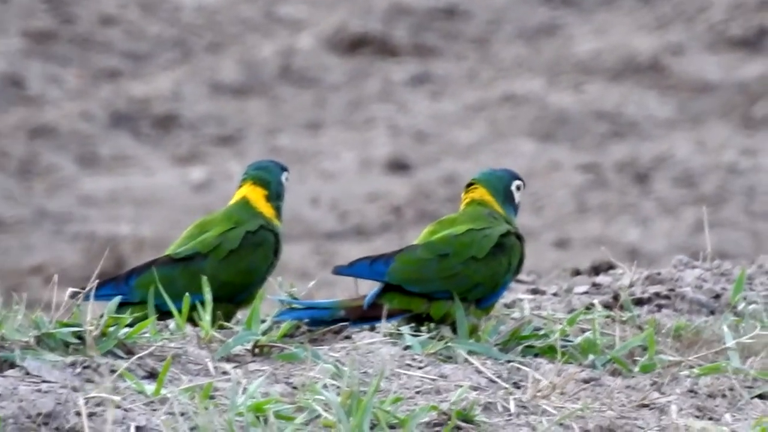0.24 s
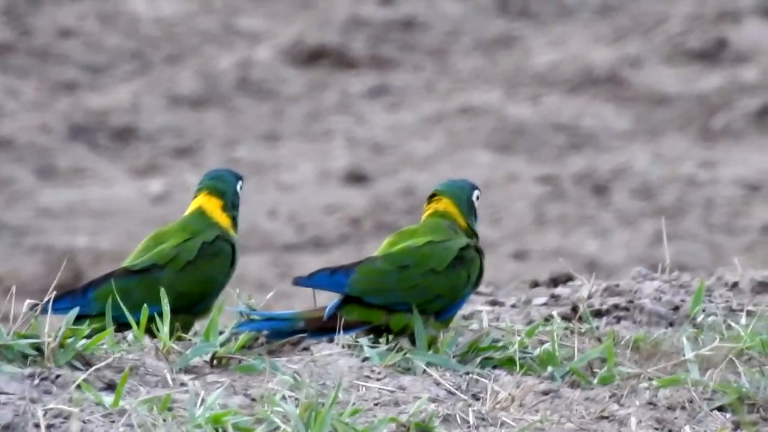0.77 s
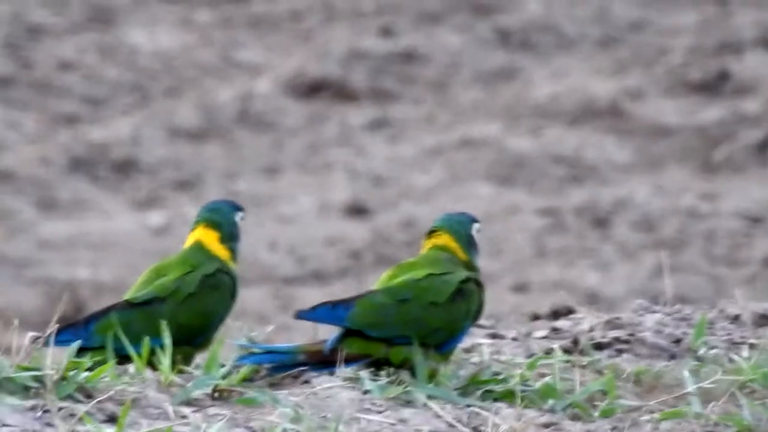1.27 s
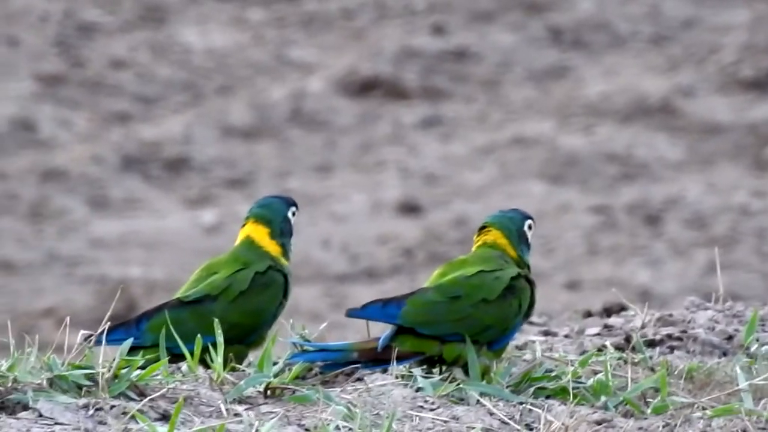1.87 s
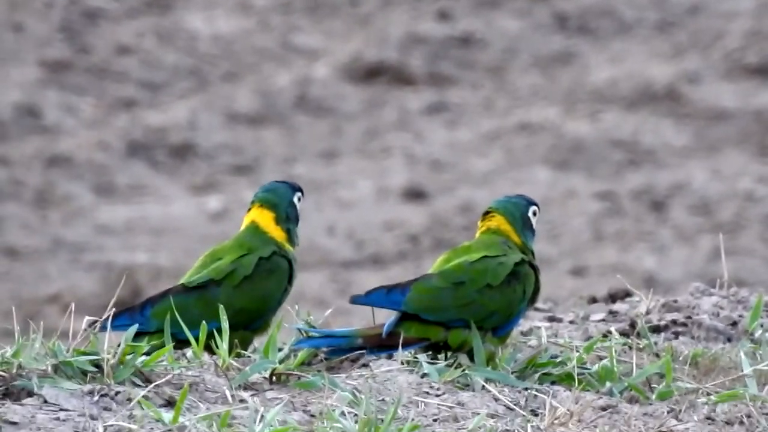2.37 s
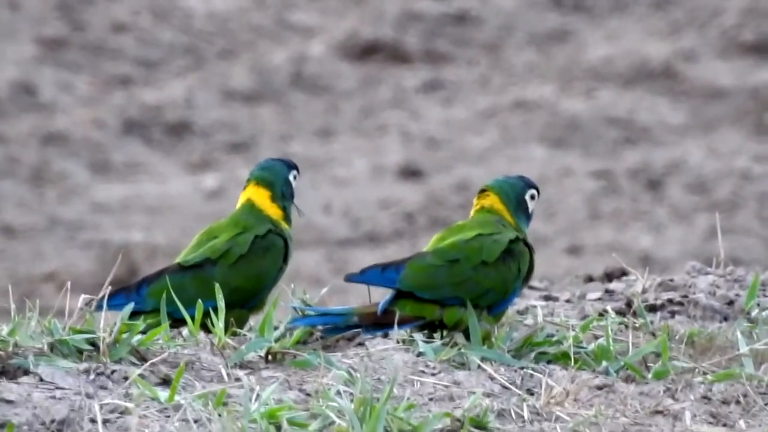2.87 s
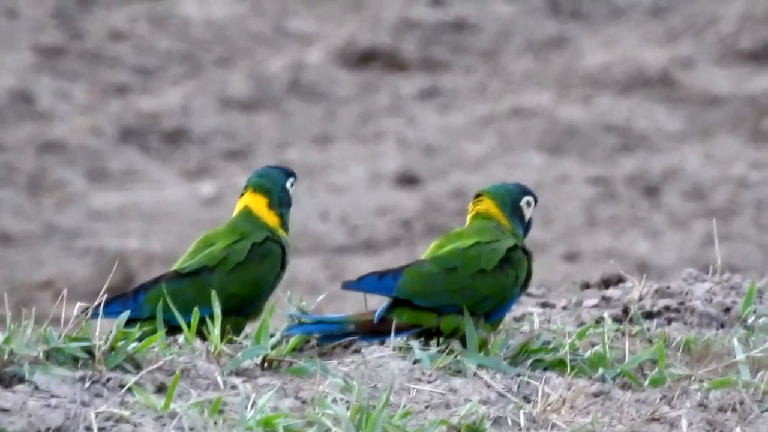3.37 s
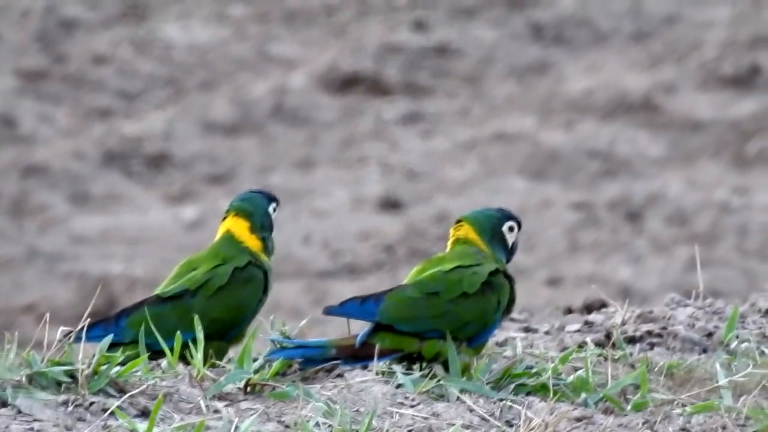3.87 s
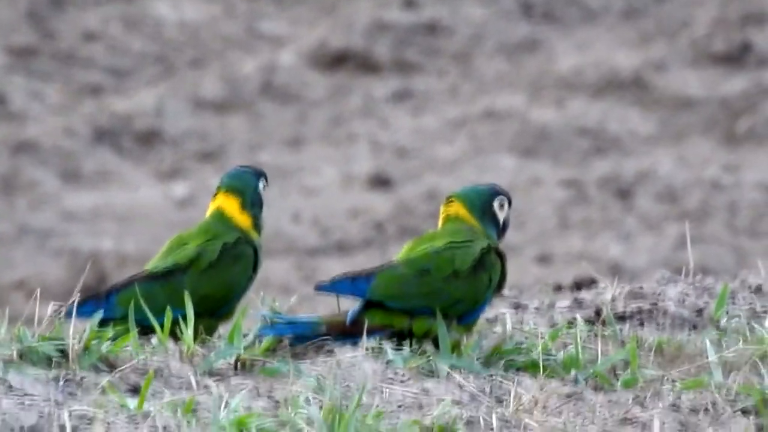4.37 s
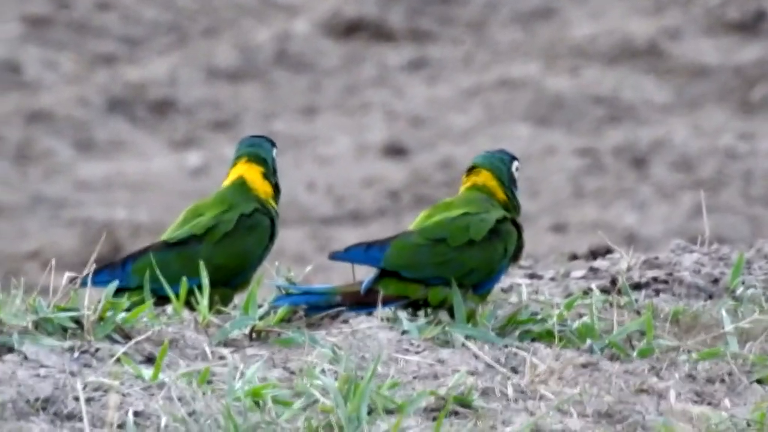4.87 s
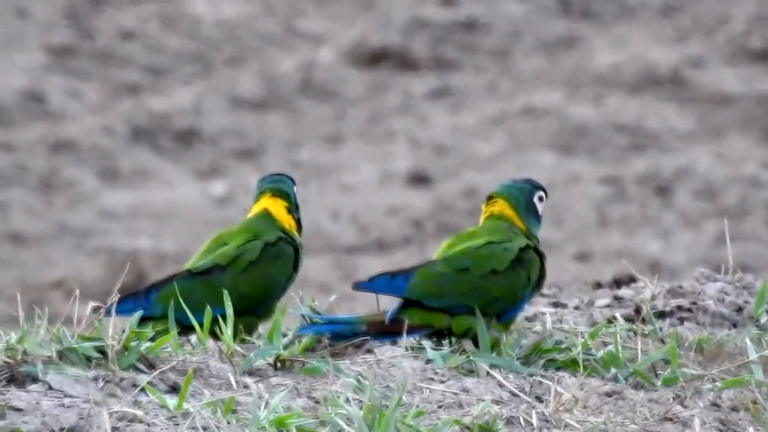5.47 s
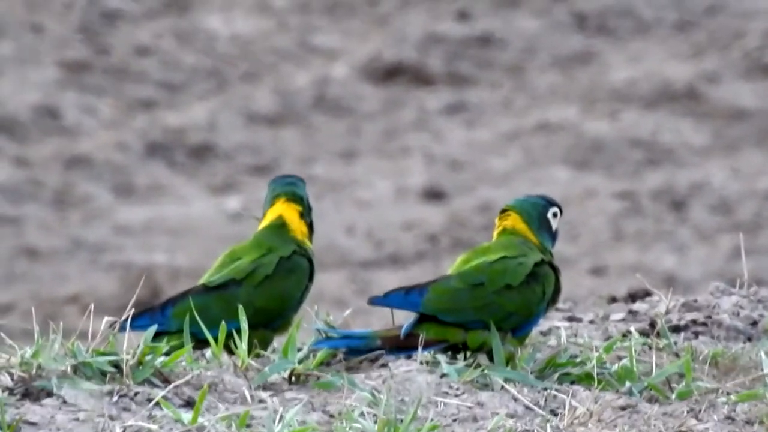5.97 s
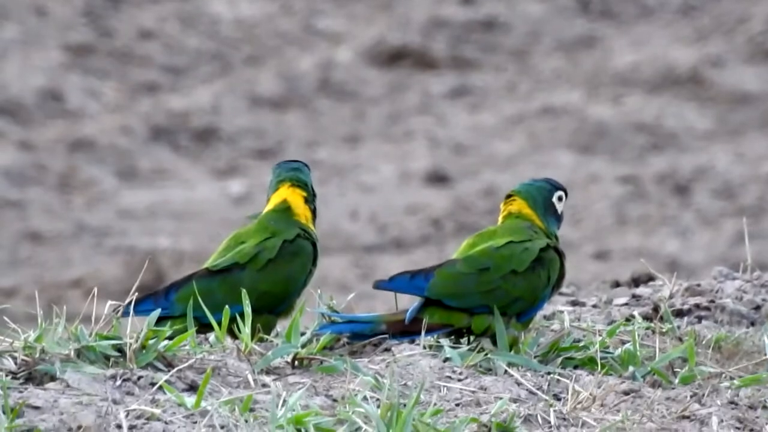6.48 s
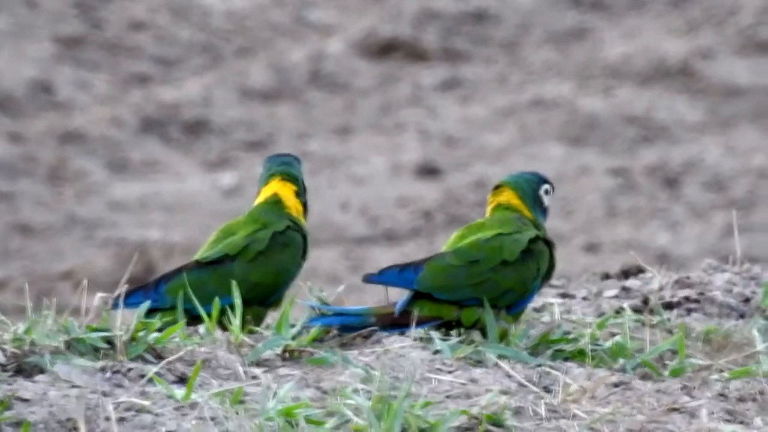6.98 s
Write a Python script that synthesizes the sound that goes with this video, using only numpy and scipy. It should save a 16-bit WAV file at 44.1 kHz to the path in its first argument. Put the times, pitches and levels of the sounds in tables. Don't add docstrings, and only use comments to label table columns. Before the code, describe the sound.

Two parrots on open ground give seven harsh, fluttering screeches that echo off trees, with soft wind hush, small clicks and a final wing whirr.

```python
import sys
import numpy as np
from scipy import signal
from scipy.io import wavfile
from scipy.ndimage import uniform_filter1d

SR = 44100
rng = np.random.default_rng(int(sys.argv[2]) if len(sys.argv) > 2 else 0)


def log_audio(samples):
    frames = np.atleast_2d(samples).T
    limited = np.clip(frames, -1, 1)
    pcm = np.round(limited * 32767).astype(np.int16)
    wavfile.write(sys.argv[1], SR, pcm)


def gain_from_db(level_db):
    decades = np.asarray(level_db, float) / 20
    return 10 ** decades


N = 319284


def rms_one(x):
    return x / np.sqrt(np.mean(x ** 2) + 1e-20)


def columns(rows, t):
    s, *cols = np.transpose(rows)
    return [np.interp(t, s, c) for c in cols]


def at_hz(points, hz):
    points_hz, points_db = np.array(points)[:, 0], np.array(points)[:, 1]
    return np.interp(np.log(hz), np.log(points_hz), points_db)


def wander(hz, size):
    run_in = int(2 * SR / hz)
    low_pass = signal.butter(2, hz, fs=SR, output="sos")
    drift = signal.sosfilt(low_pass, rng.standard_normal(size + run_in))
    return rms_one(drift[run_in:])


def band(x, low_hz, high_hz):
    return signal.sosfilt(signal.butter(2, [low_hz, high_hz], "band", fs=SR, output="sos"), x)


def noise_band(size, low_hz, high_hz):
    return rms_one(band(rng.standard_normal(size), low_hz, high_hz))


def tone(hz):
    return np.sin(2 * np.pi * np.cumsum(hz) / SR)


def add(out, s, x):
    i = int(s * SR)
    out[i:i + len(x)] += x[:N - i]


def swells(rows, calm_db):
    t = np.arange(N) / SR
    gain = gain_from_db(calm_db)
    for s, length_s, db in rows:
        gain = gain + gain_from_db(db) * np.sin(np.pi * np.clip((t - s) / length_s, 0, 1)) ** 2
    return gain


def preamp():
    return gain_from_db(-87) * noise_band(N, 6500, 11000)


def hush():
    # (frequency [Hz], level [dB per Hz])
    hush_colour = [(53, -53), (90, -15.5), (212, -1.5), (298, 1), (1080, -8), (1450, -8.5), (1960, -10.5),
                   (4330, -30), (5980, -19.5), (7400, -32), (10400, -30.5), (13800, -40), (15000, -43)]
    # (time [s], level [dB])
    hush_swell = [(0.0, -64), (1.03, -65.5), (3.1, -66), (3.43, -59.5), (3.67, -60.5), (5.28, -66.5),
                  (6.75, -63.5), (7.24, -66)]
    # (frequency [Hz], width [Hz], level [dB])
    insects = [(5290, 250, -87), (5980, 230, -85.5)]
    out, white = 0, rng.standard_normal((2, N))
    edges_hz = 70 * 2 ** np.arange(0, 8.1, .5)
    for k, (low_hz, high_hz) in enumerate(zip(edges_hz, edges_hz[1:])):
        patchy_db = 2.4 * wander(9.33, N // 8 + 1).repeat(8)[:N]
        level_db = at_hz(hush_colour, np.sqrt(low_hz * high_hz)) + patchy_db
        out = out + gain_from_db(level_db) * band(white[k % 2], low_hz, high_hz)
    out = rms_one(out) * gain_from_db(columns(hush_swell, np.arange(N) / SR)[0] + 4.0)
    for hz, width_hz, level_db in insects:
        out += gain_from_db(level_db) * noise_band(N, hz - width_hz / 2, hz + width_hz / 2)
    return out


def stirring():
    # (time [s], length [s], level [dB])
    stirs = [(0.3, 0.48, -77), (1.2, 1.3, -73.5), (3.05, 0.7, -64), (4.9, 0.92, -67), (6.2, 1.03, -67)]
    # (time [s], length [s], level [dB])
    gusts = [(-0.1, 0.16, -68), (0.33, 0.14, -74), (0.53, 0.14, -57.5), (1.88, 0.2, -76), (2.2, 0.14, -74),
             (3.16, 0.11, -77), (3.6, 0.18, -80), (3.95, 0.2, -81), (4.22, 0.15, -63), (5.52, 0.52, -72.5),
             (7.1, 0.26, -71)]
    grass = rms_one(band(rng.standard_normal(N) * gain_from_db(1.7 * wander(60, N)), 1200, 4300))
    wind = rms_one(band(band(rng.standard_normal(N), 40, 130), 35, 140))
    return swells(stirs, -78.5) * grass + swells(gusts, -77.5) * gain_from_db(-6.5) * wind


def far_birds():
    # (time [s], length [s], start pitch [Hz], end pitch [Hz], level [dB])
    far_notes = [(.12, 0.031, 595, 586, -67.5), (.14, 0.13, 167, 169, -71), (.14, 0.14, 328, 339, -73),
                 (.3, 0.036, 2850, 2880, -77), (.37, 0.068, 4180, 4040, -78),
                 (.46, 0.23, 2010, 1960, -74.5), (.63, 0.085, 2930, 2920, -77.5),
                 (.89, 0.2, 1970, 2164, -76), (0.148, 0.016, 2100, 1450, -68),
                 (0.223, 0.016, 1420, 2360, -69), (1.262, 0.018, 1920, 2700, -69.5),
                 (.48, 0.032, 2890, 2900, -77), (2.904, .1, 2000, 2030, -79),
                 (1.14, 0.034, 3050, 3100, -82), (1.445, 0.085, 2050, 1946, -75.5),
                 (1.5, 0.034, 1240, 1176, -72), (2.37, .03, 1900, 1904, -99), (2.4, 0.036, 602, 646, -74),
                 (5.611, 0.072, 2330, 2460, -66.5), (4.17, 0.097, 469, 508, -75),
                 (5.33, 0.26, 168.6, 154.2, -74), (5.37, 0.1, 334, 318, -69), (5.44, 0.037, 367, 380, -64)]
    out = np.zeros(N)
    for s, length_s, start_hz, end_hz, level_db in far_notes:
        size = int(length_s * SR)
        hz = np.linspace(start_hz, end_hz, size) * (1 + .04 * wander(120, size))
        swell = np.sqrt(np.hanning(size)) * (1 + 0.26 * wander(96, size))
        add(out, s, gain_from_db(level_db + 11.5) * swell * tone(hz))
    return out


def wings():
    # (end time [s], low whirr level [dB], feather rustle level [dB])
    downstrokes = [(6.86, -62, -58), (6.978, -56.5, -57), (7.078, -48.5, -54), (7.175, -51, -57),
                   (7.26, -53, -62)]
    stroke_s, whirr_hz, swell_db_per_s, stop_s = 0.092, 359.6, 598, 0.014
    out, t = np.zeros(N), np.arange(0, stroke_s, 1 / SR)
    stroke = np.clip(np.minimum(t / 0.02, (stroke_s - t) / stop_s), 0, 1)
    swell = stroke * gain_from_db(-swell_db_per_s * np.maximum(stroke_s - 0.028 - t, 0))
    for end_s, whirr_db, rustle_db in downstrokes:
        whirr = np.sqrt(2) * tone(whirr_hz * (1 + 0.044 * wander(40, len(t))))
        grain = rng.standard_normal(len(t)) * gain_from_db(2 * wander(165, len(t)))
        rustle = rms_one(band(grain, 145, 2040)) + gain_from_db(-18.0) * rms_one(band(grain, 2300, 5300))
        puff = gain_from_db(rustle_db) * stroke * gain_from_db(-40 * t) * rustle
        add(out, end_s - stroke_s, gain_from_db(whirr_db) * swell * whirr + puff)
    return out


def snaps():
    # (time [s], peak level [dB], centre frequency [Hz],
    # time to fade by 60 dB [s], bright crack relative to the peak [dB])
    clicks = [(0.358, -40.5, 1190, 0.021, -22), (0.558, -43.5, 700, 0.032, -25),
              (1.789, -44, 853, 0.016, -21), (2.376, -40.5, 777, 0.022, -39), (3.071, -43, 433, 0.023, -25),
              (3.159, -56, 260, 0.033, 7), (3.193, -34, 1080, 0.016, -7), (3.203, -28.5, 240, 0.02, -8),
              (3.211, -38, 710, 0.016, -15), (3.217, -38.5, 324, 0.038, -7), (3.262, -41, 350, 0.034, -15),
              (3.273, -38.5, 350, 0.027, -6), (3.318, -34.5, 727, 0.015, -14),
              (3.319, -41.5, 1580, 0.026, 4), (3.345, -39.5, 350, 0.15, -18),
              (3.399, -36.5, 515, 0.033, -6), (3.413, -39, 2600, 0.018, -5), (3.429, -37, 2730, 0.023, -3),
              (3.803, -35, 2300, 0.032, -9), (5.295, -33, 517, 0.012, -30.5)]
    out, t = np.zeros(N), np.arange(4000) / SR
    for s, peak_db, hz, fade_s, crack_db in clicks:
        ringing = np.cos(2 * np.pi * hz * t) * (gain_from_db(-60 * t / fade_s) + gain_from_db(-60 * t / 0.0028))
        rustle = gain_from_db(-6.5) * noise_band(len(t), 120, 1800)
        crack = gain_from_db(crack_db) * noise_band(len(t), 1820, 9500)
        noise = (rustle + crack) * gain_from_db(-60 * t / (3.7 * fade_s))
        add(out, s, gain_from_db(peak_db - 8) * (ringing + noise))
    return band(band(out, 130, 4940), 100, 10400)


def screech(rows, stretch, mouth_db, open_db, low_db, beak_db, flutter, rasp, clears, left):
    # (frequency [Hz], level [dB])
    throat_colour = [(400, -20.5), (900, -12), (1300, -7), (1800, 0), (2700, -1.5), (3500, 0.5),
                     (4050, -15), (4500, -7), (5250, -21.5), (6200, -16.5), (7700, -26.5), (9000, -42.5),
                     (12000, -51), (16000, -81)]
    mouth_octaves, beak_hz, beak_octaves = 0.28, 4100, 0.079
    t = np.arange(rows[0][0], rows[-1][0], 1 / SR)
    level_db, hz, mouth_hz = columns(rows, t)
    share = (t - t[0]) / (t[-1] - t[0])

    weak_db = np.maximum(level_db - level_db.max(), -28)
    tilt_db = open_db + 0.49 * weak_db
    first_db = low_db + 0.32 * weak_db + 9 * share ** 5.7

    clearing = clears - .12
    flutter = flutter * np.interp(share, [clearing, clears], [1, left])
    rasp = np.interp(share, [clearing, clears, .95, 1], [rasp, left * rasp, left * rasp, .55])
    flutter_hz = 80 * (1 + .06 * wander(15, len(t)))
    beat = 2 * np.pi * np.cumsum(flutter_hz) / SR
    slips = np.maximum(wander(170, len(t)), -.4)
    hz = hz * (1 + .055 * flutter * (np.sin(beat) - .35) + .07 * rasp * slips)

    phase, out = 2 * np.pi * np.cumsum(hz) / SR, 0
    for k in range(1, 26):
        mouth_distance = np.log2(k * hz / mouth_hz) / mouth_octaves
        beak_distance = np.log2(k * hz / (beak_hz * stretch)) / beak_octaves
        gain_db = tilt_db * np.log2(k * hz / 2500) + first_db * (k == 1)
        gain_db += mouth_db * np.exp(-mouth_distance ** 2)
        gain_db += beak_db * np.exp(-beak_distance ** 2)
        gain_db += 4 * rasp * wander(35, len(t))
        blur_depth = .46 * rasp + .004 * rasp.max() * k * k
        blur = 1 + blur_depth * (wander(300, len(t)) + 1j * wander(300, len(t)))
        blur = blur / np.sqrt(np.mean(abs(blur) ** 2))
        partial = np.real(blur * np.exp(1j * (k * phase + .9 * k * k)))
        out = out + gain_from_db(gain_db) * (k * hz < 16000) * partial

    throat_db = at_hz(throat_colour, np.arange(513) * SR / 1024 / stretch + 1)
    throat = signal.firwin2(401, np.arange(513) / 512, gain_from_db(throat_db))
    out = signal.fftconvolve(out, throat, "same")
    out = out / np.sqrt(uniform_filter1d(out ** 2, size=900))
    edge = np.clip(np.minimum(t - t[0], t[-1] - t) / 0.0049, 0, 1)
    return out * (1 + .42 * flutter * np.sin(beat + .5)) * gain_from_db(level_db - 1.5) * edge


def tree_echo(calls):
    t = np.arange(SR) / SR
    white = rng.standard_normal((3, SR)) * (1 - np.exp(-t / 0.0017))
    tail = band(white[0], 1090, 5000) * gain_from_db(-60 * t / 0.54)
    tail += gain_from_db(4.0) * band(white[1], 4170, 12900) * gain_from_db(-60 * t / 0.59)
    tail += gain_from_db(-8.0) * band(white[2], 1840, 3360) * gain_from_db(-60 * t / 0.89)
    swaying = np.interp(np.arange(N) + 4 * wander(70, N), np.arange(N), calls)
    return gain_from_db(-7) * signal.fftconvolve(swaying, tail / np.sqrt(np.sum(tail ** 2)))[:N]


def parrots():
    # (time [s], level [dB], pitch [Hz], mouth resonance [Hz])
    screeches = [
        [(1.78, -62.5, 426, 1920), (1.846, -55, 518, 2000), (1.9, -47, 543.4, 2940), (1.96, -43, 602.6, 3240),
         (2.014, -37.5, 644, 3440), (2.056, -36.5, 628, 3350), (2.095, -39.5, 623, 2570),
         (2.12, -54, 642, 2640)],
        [(3.37, -67, 506.6, 2230), (3.446, -40, 670, 2800), (3.542, -32, 738.4, 3000), (3.58, -29, 815.4, 3200),
         (3.632, -32.5, 626, 2950), (3.668, -32, 669, 2000), (3.686, -29, 611, 2340), (3.697, -36, 623, 2330)],
        [(3.83, -45.5, 507, 2620), (3.854, -32.5, 679, 2950), (3.892, -27.5, 888, 2260), (4.0, -26, 904, 2250),
         (4.068, -24, 699.6, 2550), (4.086, -27.5, 782.6, 2220), (4.106, -26, 645, 2430),
         (4.12, -58, 517, 2400)],
        [(4.26, -46.5, 573, 2760), (4.284, -27, 711.5, 2660), (4.32, -26, 888, 2040), (4.37, -25, 926, 2100),
         (4.472, -24.5, 877.6, 2060), (4.498, -24, 752.3, 2840), (4.532, -26.5, 785, 2250),
         (4.578, -29, 563.4, 2400)],
        [(4.74, -47.5, 684, 2740), (4.796, -26.5, 724.6, 2770), (4.852, -28, 899, 2080),
         (4.926, -24.5, 900, 1910), (5.022, -25, 875, 2560), (5.044, -23.5, 751, 2518), (5.076, -25, 786, 2370),
         (5.108, -33.5, 534, 2394)],
        [(5.645, -56, 606, 2070), (5.665, -48.5, 594, 1950), (5.733, -33, 810, 3050), (5.8, -29, 925, 2660),
         (5.879, -28, 900, 2870), (5.923, -29, 825, 2740), (5.941, -29.5, 743, 2450), (5.962, -29, 717, 2540)],
        [(6.185, -60, 589, 2040), (6.207, -47, 631, 2950), (6.299, -30, 926, 1960), (6.337, -29.5, 973, 2720),
         (6.447, -30, 918, 2960), (6.477, -26.5, 797, 2440), (6.503, -30, 881, 2500), (6.538, -32, 664, 2230)],]
    # (time [s], level [dB], pitch [Hz], mouth resonance [Hz])
    cluck = [(4.172, -46, 489, 2400), (4.212, -35.5, 475.5, 2400), (4.235, -45, 495, 2400)]
    # (stretch of the resonances [ratio], mouth lift [dB],
    # tilt at full effort [dB per octave], first partial [dB], beak lift [dB])
    throat_shapes = [(1.055, 6.5, -1.5, -2.5, 5.5), (0.932, 2, 3.5, -0.5, 0), (0.968, 7, 4, 2.5, 3),
                     (0.974, 6.5, 4.5, 4.5, -0.5), (0.967, 5, 2, -0.5, 1), (1.02, 5, 3.5, 2.5, -1),
                     (1.031, 10.5, 3, 0.5, -8), (1.02, 5.5, 3.7, 14, 2)]
    harshness = [(1.4, .4, .9, .9), (1.05, .62, .8, .35), (.6, .6, .75, .5), (.55, .65, .6, .45),
                 (.55, .65, .8, .45), (.6, .75, .85, .55), (.55, .55, .5, .45), (.2, .5, .9, 1)]
    out = np.zeros(N)
    for rows, shape, harsh in zip(screeches + [cluck], throat_shapes, harshness):
        add(out, rows[0][0], screech(rows, *shape, *harsh))
    return out + tree_echo(out)


def scene():
    mono = preamp() + hush() + stirring() + far_birds() + wings() + snaps() + parrots()
    return np.array([mono, mono])


def top_cut(x):
    return signal.sosfilt(signal.butter(12, 15590, fs=SR, output="sos"), x)


def record(dry):
    heard = signal.sosfilt(signal.butter(2, 40, "high", fs=SR, output="sos"), dry)
    return top_cut(0.2 * np.tanh(heard / 0.18))


dry = scene()
out = record(dry)
log_audio(out)
```